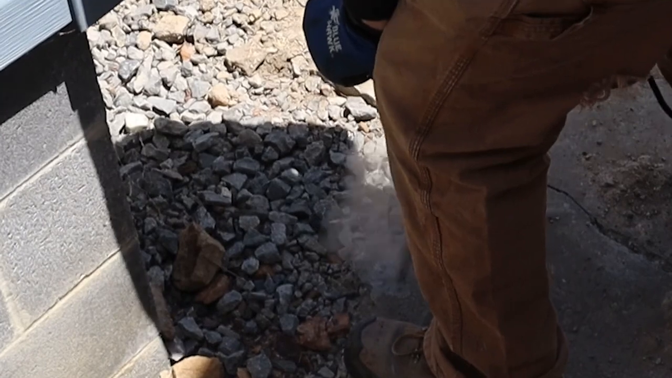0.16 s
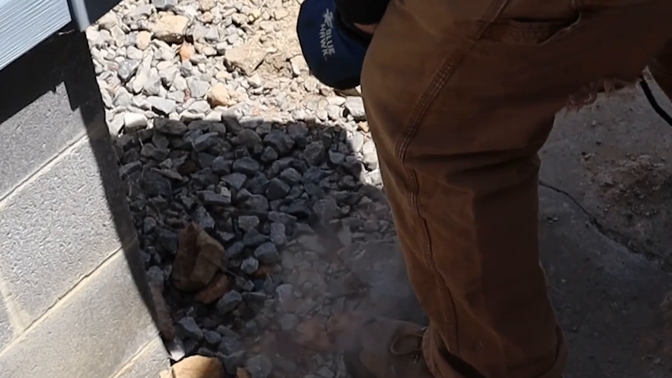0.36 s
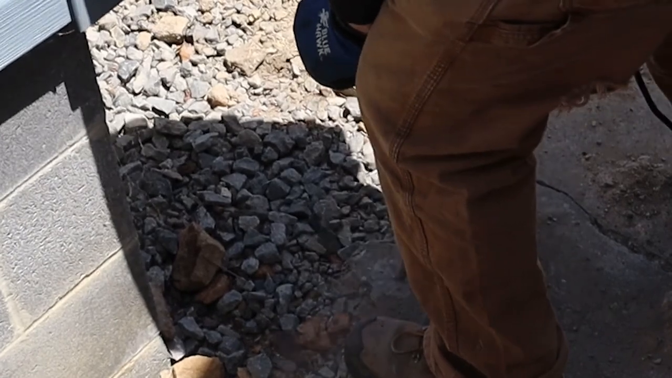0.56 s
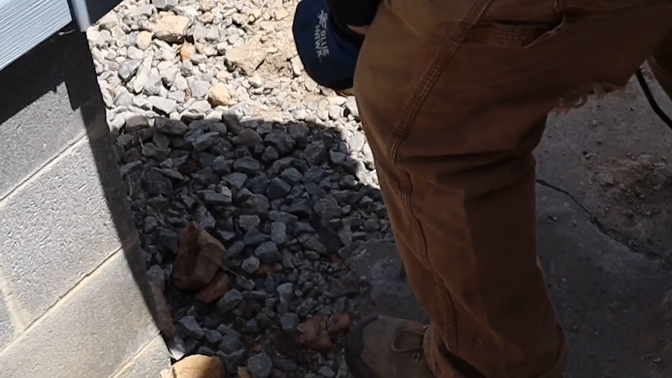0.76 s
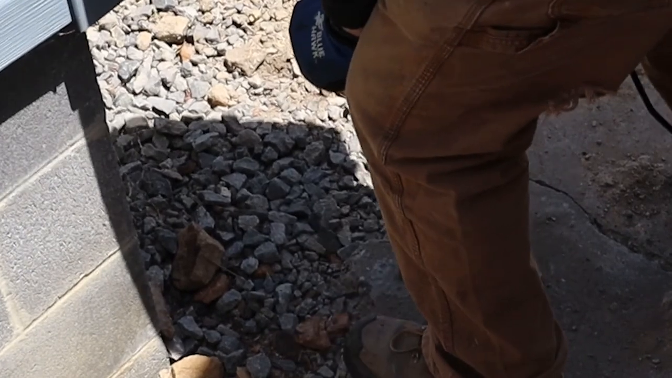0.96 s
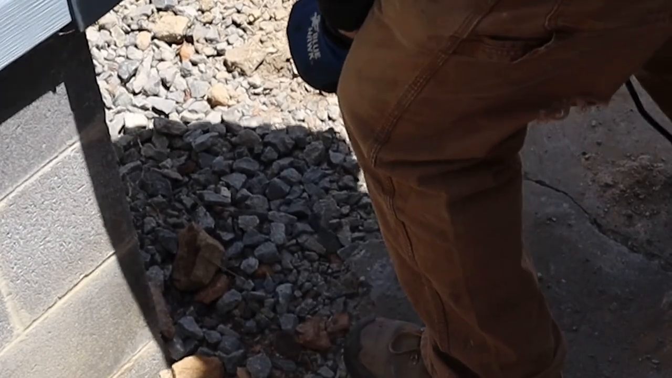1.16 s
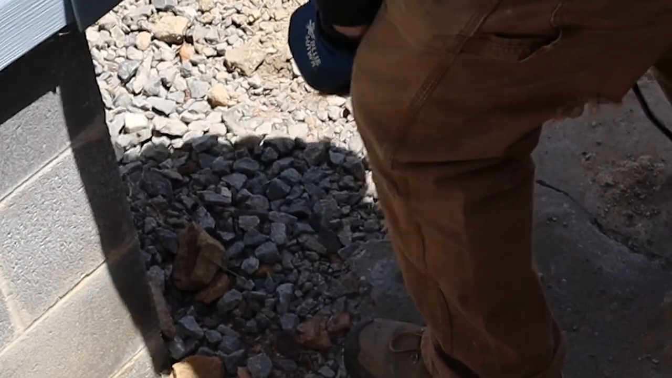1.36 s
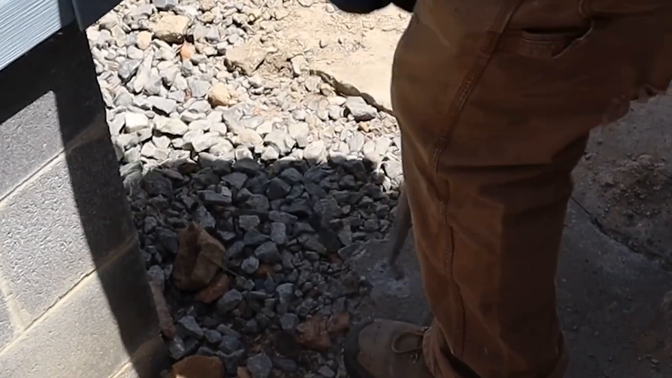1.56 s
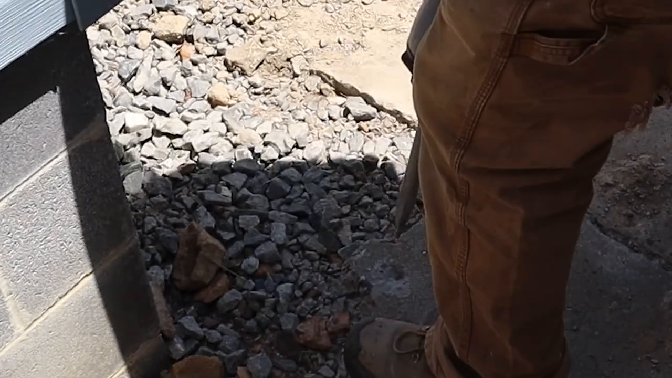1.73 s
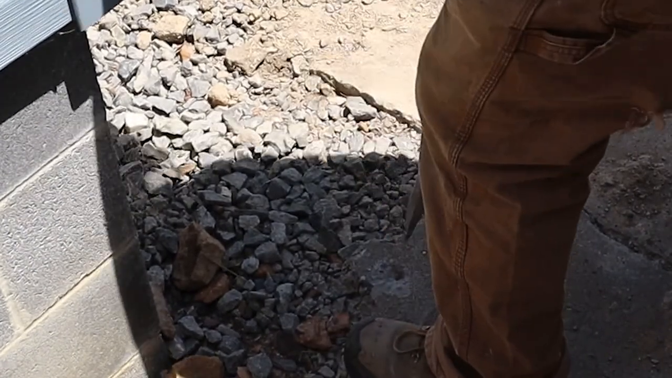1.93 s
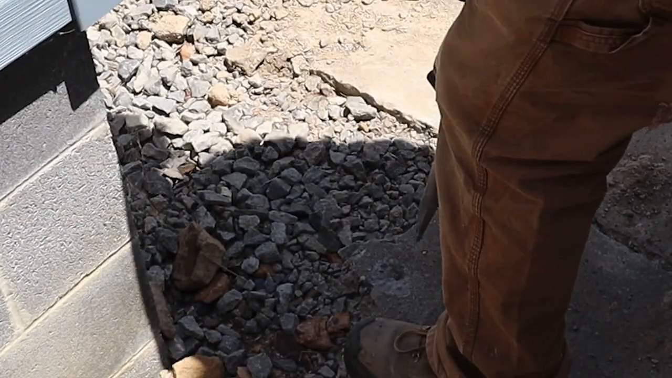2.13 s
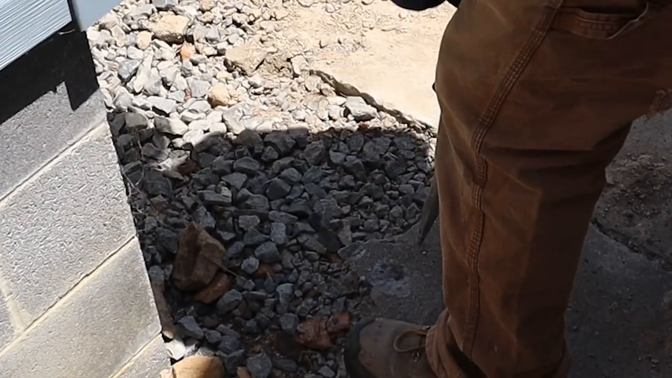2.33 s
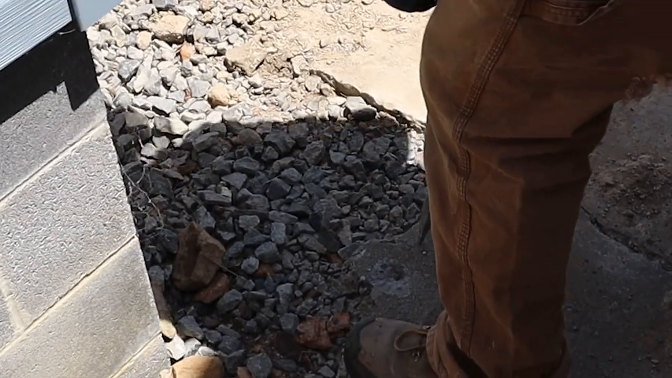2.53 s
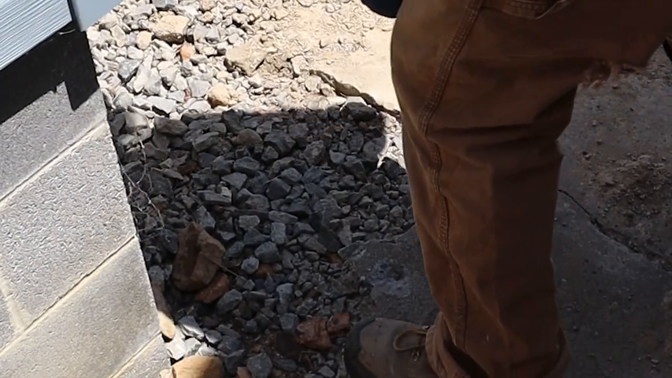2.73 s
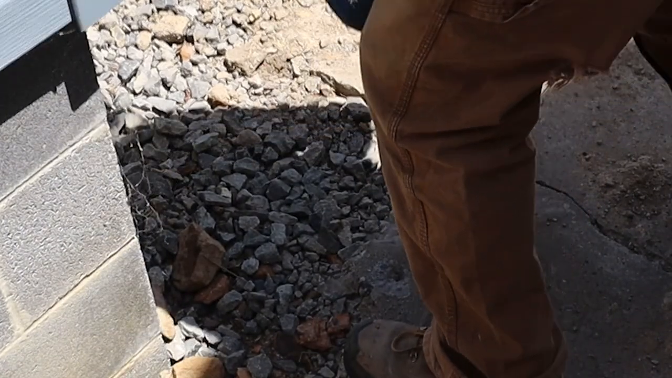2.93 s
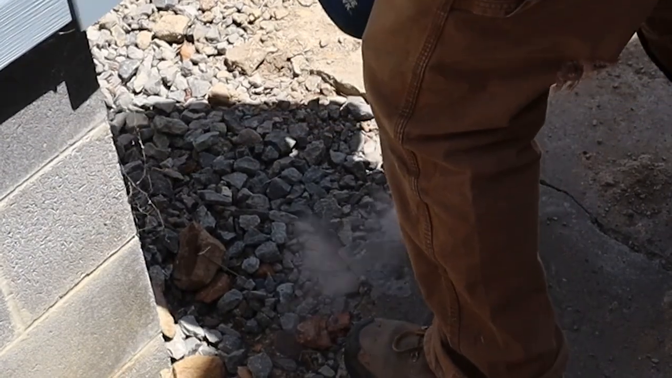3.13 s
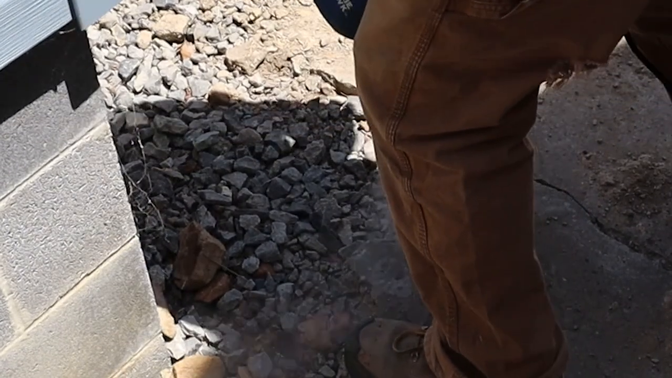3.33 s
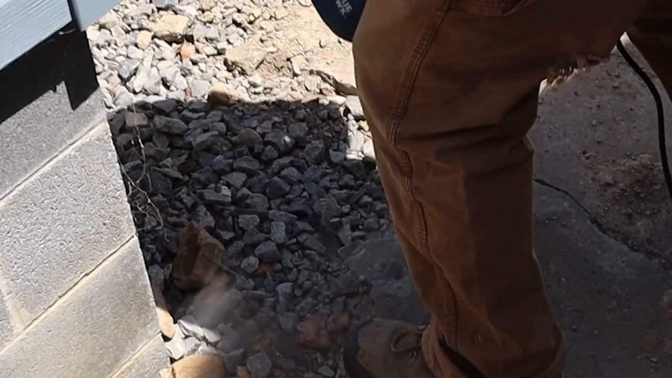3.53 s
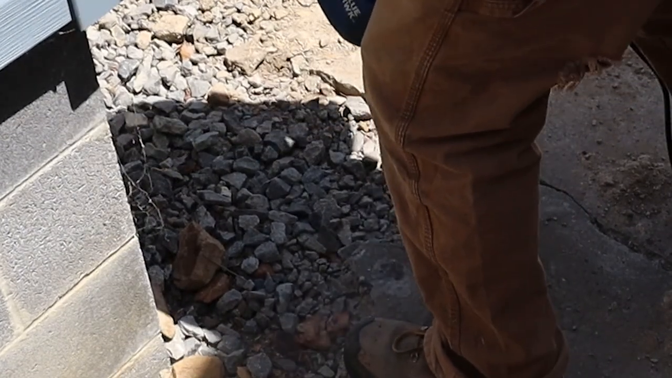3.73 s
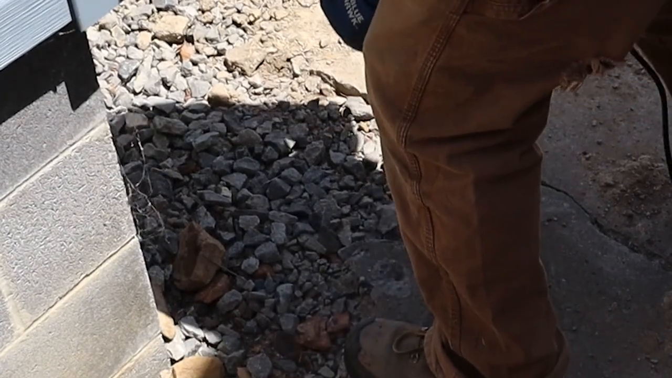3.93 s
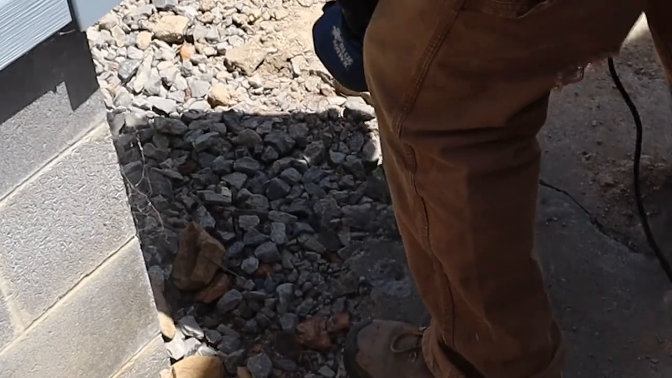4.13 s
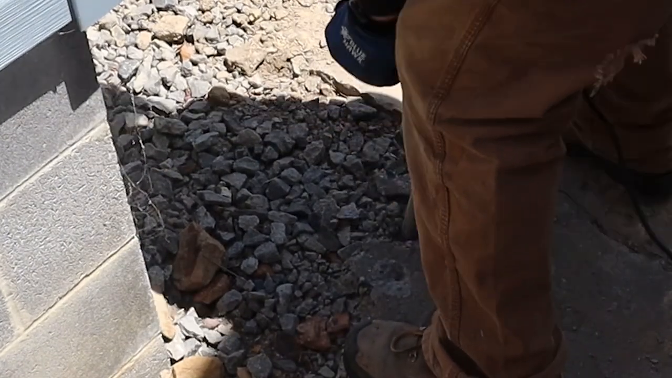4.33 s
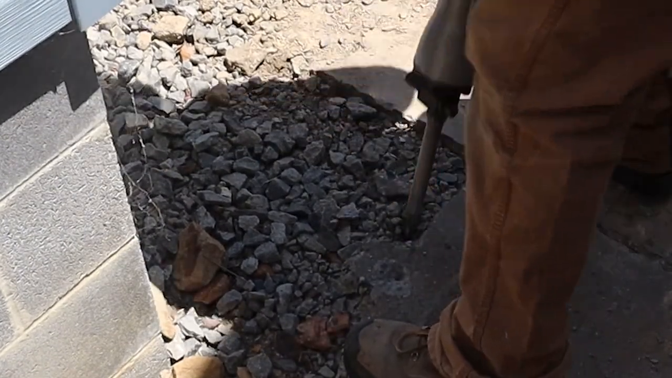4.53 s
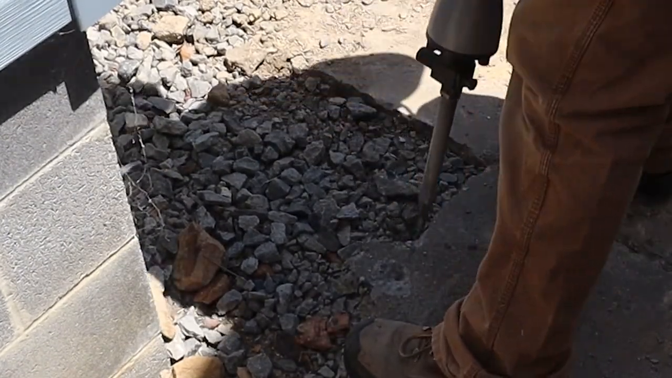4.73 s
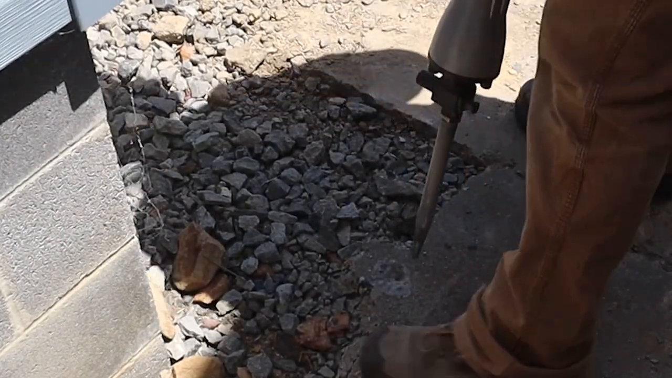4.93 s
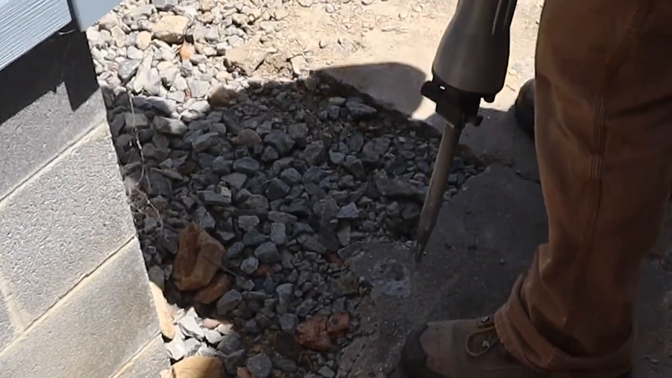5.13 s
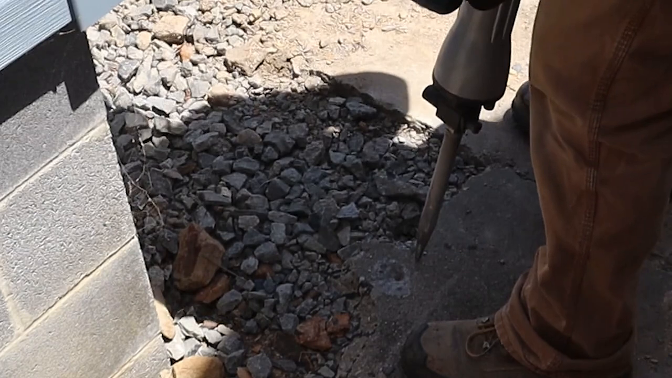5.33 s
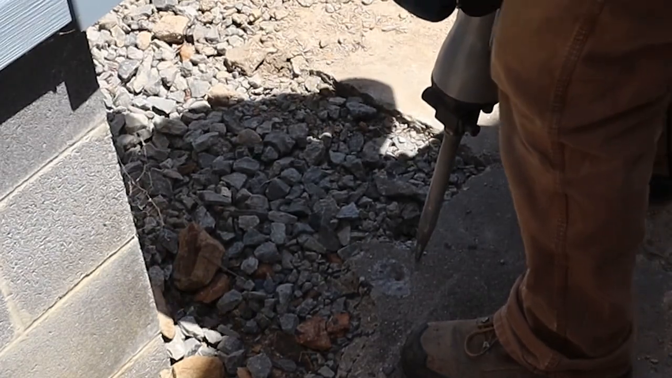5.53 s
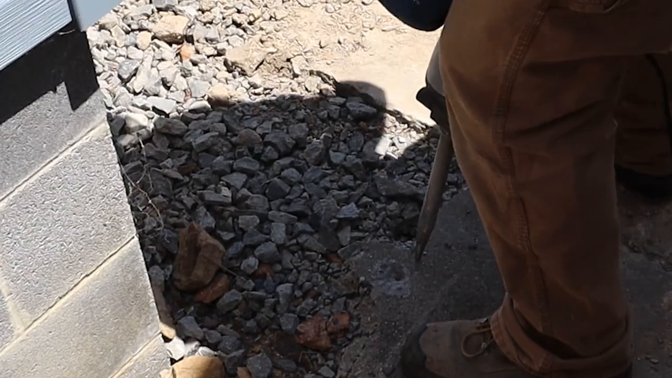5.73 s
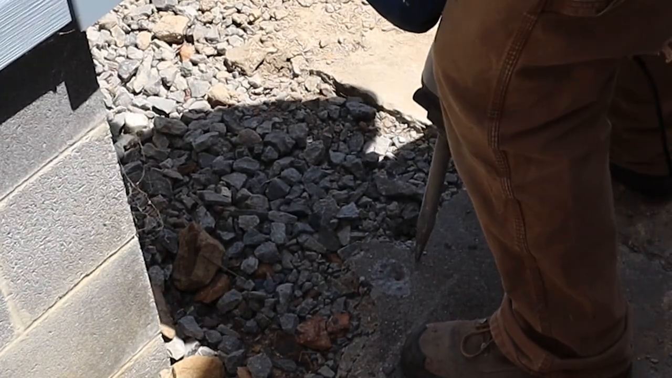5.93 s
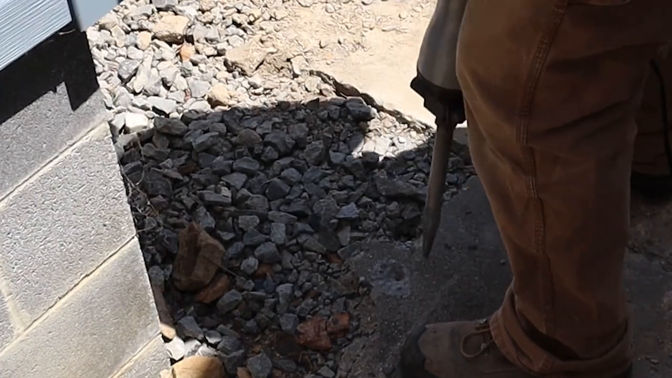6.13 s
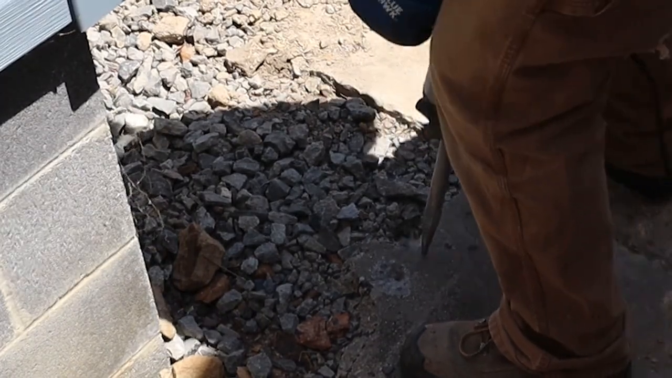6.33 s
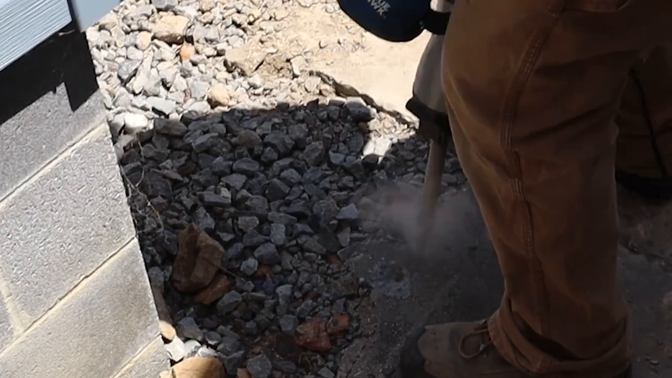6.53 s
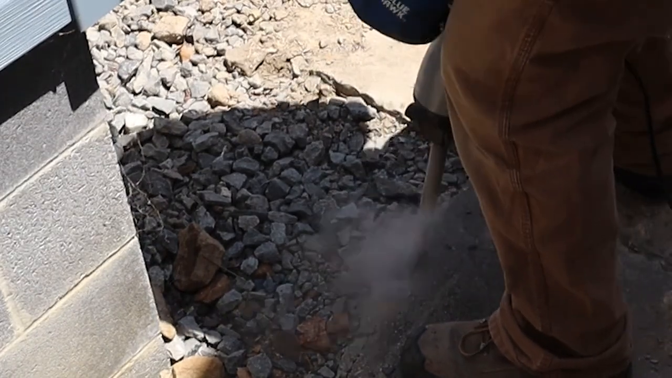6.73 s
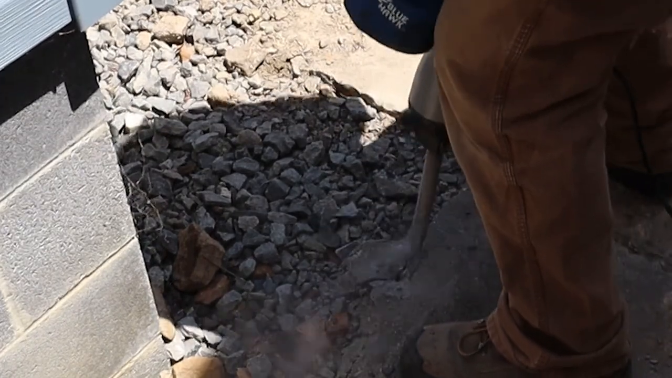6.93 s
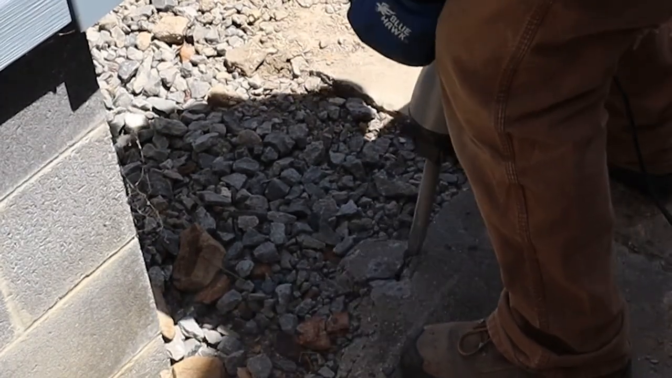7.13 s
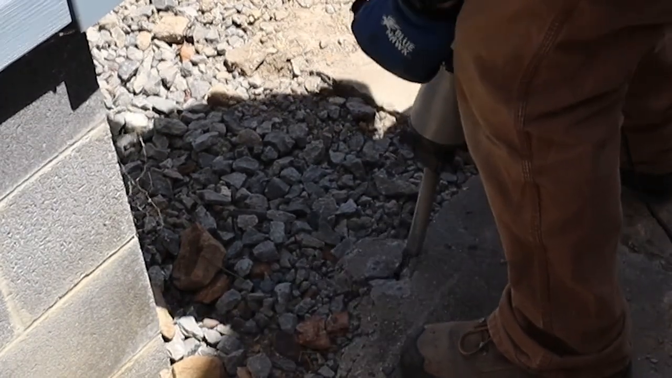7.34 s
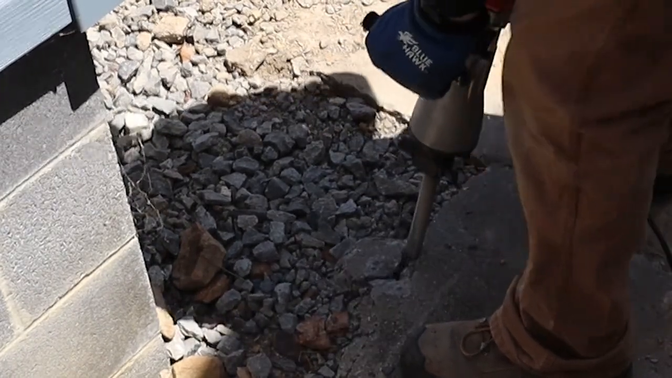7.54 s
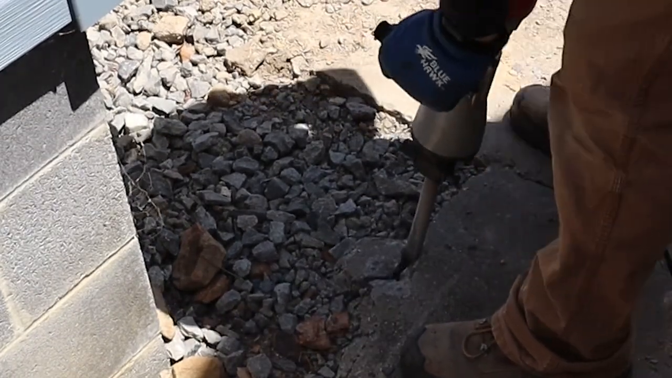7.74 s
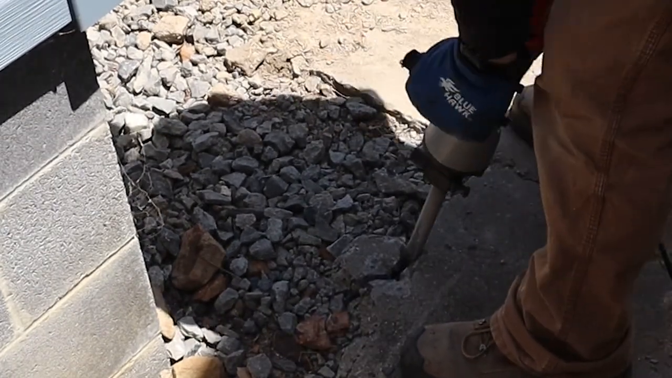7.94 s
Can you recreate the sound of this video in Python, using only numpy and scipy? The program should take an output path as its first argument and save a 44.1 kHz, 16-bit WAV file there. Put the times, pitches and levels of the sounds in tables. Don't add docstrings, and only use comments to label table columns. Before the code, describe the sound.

Close stereo outdoors, with a short diffuse tail from wall and rubble. From the start an electric demolition hammer is at full work, about twenty-four even blows a second: hard concrete crack, brief steel ring, low slab thud, over gritty motor roar and hiss. At 1.5 s it stops and coasts down, piston chuffs slowing until about 2.2 s, with small clicks and dull knocks near 2.4 s. At 2.8 s the motor surges, and from 2.95 s a louder burst hammers, weakening near 3.9 s into brighter, lighter strokes until 4.4 s. Chuffs widen and dull until 5.4 s, with stone ticks and thumps. At 5.65 s the motor kicks in and the loose chisel rattles rapidly until 6.4 s. The third burst cracks and rings, thin high singing around 6.7 s, thud thinning; a whine climbs to 7.4 s, then clanking blows space out until 7.9 s.

```python
import sys
import numpy as np
from scipy import signal
from scipy.fft import rfft, irfft, next_fast_len
from scipy.io import wavfile
from scipy.ndimage import map_coordinates

SR = 44100
rng = np.random.default_rng(int(sys.argv[2]) if len(sys.argv) > 2 else 0)


def attenuation_scalar(level_db):
    decades = np.asarray(level_db, float) / 20
    return 10 ** decades


def waveform_to_disk(signal):
    frames = np.transpose(np.atleast_2d(signal))
    scaled = np.clip(frames, -1, 1) * 32767
    samples = np.round(scaled).astype(np.int16)
    wavfile.write(sys.argv[1], SR, samples)


N = 356328

# time in seconds, effort in dB, weight on the slab in dB.
MOTOR_RUNS = [
    [(0, -40, -39.5), (1.5, -41.5, -40.5), (1.6, -43.5, -43.5), (1.66, -50, -58), (1.702, -52.5, -76.5),
     (2.378, -55, -61), (2.56, -74, -65.5), (2.74, -88.5, -96)],
    [(2.765, -54, -54), (2.8, -39, -45), (2.87, -37, -74), (2.96, -36.5, -50), (3.11, -37.5, -43),
     (3.44, -37.5, -44.5), (3.88, -40, -47), (4.08, -39, -62), (4.35, -40, -56.5), (4.65, -47, -61),
     (5.19, -53, -56), (5.4, -66, -61), (5.52, -90.5, -74.5)],
    [(5.6, -82, -67), (5.68, -35, -38), (5.78, -67, -57), (5.95, -44, -48), (6.31, -36, -46),
     (6.6, -34, -37), (6.95, -38, -47), (7.44, -37.5, -41.5), (7.8, -45, -46), (8.08, -60, -64)],
]
STEADY_DB = -37.5
# time in seconds, knocks per second, level in dB.
LOOSE_CHISEL = [
    (5.62, 43, -120),
    (5.64, 65, -43),
    (5.73, 46, -34),
    (5.9, 54, -28),
    (6.25, 59, -27.5),
    (6.36, 34, -26),
    (6.6, 83, -40.5),
    (6.7, 35, -120),
]
# frequency in Hz, density in dB per Hz.
HARD_EDGE = [(3530, -16), (6000, 1.5), (7970, -2), (10000, -6.5), (14200, -13.5), (16000, -5.5),
             (16500, -45)]


def unit(x):
    return x / np.sqrt(np.mean(x ** 2) + 1e-20)


def along(points, hz):
    f, v = np.transpose(points)
    return np.interp(np.log(hz + 1), np.log(f + 1), v)


def curves(rows):
    s, *cols = np.transpose(rows)
    return [np.interp(np.arange(N) / SR, s, c) for c in cols]


def wobble(rate):
    return map_coordinates(rng.standard_normal(int(N * rate / SR) + 4), [np.arange(N) * rate / SR])


def low_cut(hz, corner):
    return 1j * hz / (1j * hz + corner)


def filtered(x, response):
    m = next_fast_len(N + SR // 2)
    return irfft(rfft(x, m) * response(np.fft.rfftfreq(m, 1 / SR)), m)[..., :N]


def resonant(x, peaks):
    def response(f):
        total = 0
        for k, (center, width, db) in enumerate(peaks):
            total = total + (-1) ** k * attenuation_scalar(db) * 1j * f * width / (center * center - f * f + 1j * f * width)
        return total
    return unit(filtered(x, response))


def rush(spectrum):
    # frequency in Hz, correlation from 0 to 1.
    likeness = [(40, 0.5), (100, 0.41), (300, 0.86), (700, 0.73), (1500, 0.46), (4000, 0.25),
                (12000, 0.049)]

    def mid_and_side(hz):
        turn = np.arccos(np.clip(along(likeness, hz), -1, 1)) / 2
        return attenuation_scalar(along(spectrum, hz)) * [np.cos(turn), np.sin(turn)]
    mid, side = filtered(rng.standard_normal((2, N)), mid_and_side)
    return unit(np.array([mid + side, mid - side]))


def struck(times, gains, shape):
    train = np.bincount(np.round(np.asarray(times) * SR).astype(int), gains, N)[:N]
    return signal.fftconvolve(train[None], np.atleast_2d(shape), axes=1)[:, :N]


def place(out, s, sound):
    start = round(s * SR)
    out[..., start:start + sound.shape[-1]] += sound


def ring(modes, length, attack, scatter_db, spread, rough):
    t = np.arange(round(length * SR)) / SR
    hz, db, t60, pan = np.transpose(modes)[..., None]
    wander = np.cumsum(rng.standard_normal((len(modes), len(t))), axis=1) * rough * hz / SR
    decay_db = db + scatter_db * rng.standard_normal(hz.shape) - 60 * t / t60
    level = attenuation_scalar(decay_db) * (1 - np.exp(-t / attack))
    apart = spread * np.cos(np.arange(len(modes)) * np.e)[:, None]
    phase = 2 * np.pi * hz * t + wander
    return np.array([np.sum(level * attenuation_scalar(side * pan / 2) * np.sin(phase + side * apart), axis=0)
                     for side in (1, -1)])


def hammer():
    # time in seconds, crack peak in dB, slab thud in dB.
    effort_1 = [
        (0.0159, -16.5, -20),
        (0.2768, -13.5, -19.5),
        (0.7099, -14, -19.5),
        (1.0994, -14, -19.5),
        (1.443, -13.5, -20.5),
        (1.4883, -14.5, -19.5),
        (1.5405, -15, -23),
    ]
    effort_2 = [
        (2.965, -5.5, -23),
        (3.0126, -8, -19),
        (3.0993, -9.5, -18),
        (3.4117, -9.5, -19.5),
        (3.5392, -11.5, -19.5),
        (3.842, -14, -23),
        (3.9277, -18.5, -24.5),
        (4.0088, -15.5, -24.5),
        (4.05, -15, -31),
    ]
    effort_3 = [
        (6.3957, -15, -20),
        (6.53, -12, -22.5),
        (6.604, -17, -21.5),
        (6.6798, -15.5, -22.5),
        (6.7561, -15, -24),
        (6.8401, -22, -28),
        (6.921, -21.5, -37),
        (7.002, -20, -32.5),
        (7.3569, -18, -36),
    ]
    row_blows = [
        [0, 6, 16, 25, 33, 34, 35],
        [0, 1, 3, 10, 13, 20, 22, 24, 25],
        [0, 4, 6, 8, 10, 12, 14, 16, 25],
    ]
    # time in seconds, crack change in dB, thud change in
    # dB.
    uneven_blows = [(.234, -3.5, -2), (.884, -1, -1), (3.928, -1.5, -10), (6.429, 5, 2.5), (6.496, -14, -1.5),
                    (6.718, -1, 2.5), (7.081, -4, -2), (7.239, -1, 1), (6.462, 0.5, -3.5), (6.568, -4, 0),
                    (6.878, 0.5, 0), (7.119, -1.5, 0), (7.16, -1, 3), (7.198, 0.5, 4.5), (7.318, 0.5, -1),
                    (3.058, 1, 0), (.32, 0.5, 1)]
    # time in seconds, crack peak in dB, slab thud in dB.
    off_slab = [(2.368, -32, -41), (4.0933, -21, -46), (4.135, -32, -55), (4.1752, -25.5, -63),
                (4.215, -25.5, -59), (4.256, -24, -46), (4.2963, -23.5, -40), (4.34, -21.5, -49),
                (4.3855, -18.5, -45), (4.4395, -20, -44), (7.399, -17, -29), (7.4449, -14.5, -28),
                (7.4983, -12, -32), (7.5574, -11, -30), (7.63, -11.5, -30), (7.7243, -11, -33),
                (7.864, -14.5, -29.5)]
    jitter_s, crack_scatter_db, thud_scatter_db = .0004, 0.14, -0.74
    bursts = []
    for numbers, effort in zip(row_blows, (effort_1, effort_2, effort_3)):
        every_blow = np.arange(numbers[-1] + 1)
        rows = np.transpose([np.interp(every_blow, numbers, c) for c in np.transpose(effort)])
        rows = rows + rng.standard_normal(rows.shape) * [jitter_s, crack_scatter_db, thud_scatter_db]
        for s, crack_db, thud_db in uneven_blows:
            rows = rows + (np.abs(rows[:, :1] - s) < .015) * [0, crack_db, thud_db]
        bursts.append(rows)
    return [np.transpose([s, crack, thud - crack]) for s, crack, thud in map(np.transpose, bursts + [off_slab])]


def chisel(burst, steel, crack, edge, ring_db, edge_db, repeat_db):
    # time in seconds, rise in Hz.
    working_free = [
        (6.85, 0),
        (7.1, 330),
        (7.38, 950),
    ]
    ringing = np.zeros((2, N + SR))
    for s, db, _ in burst:
        modes = np.array(steel)
        rise_hz = np.interp(s, *np.transpose(working_free), right=0)
        shank = np.abs(modes[:, 0] - 4200) < 1400
        modes[shank] = modes[shank] + [rise_hz, 0, 0, 0]
        modes[1, 1] -= 10 * rise_hz / 1000
        blow = ring(modes, length=1 / 14, attack=0.00023, scatter_db=2.5, spread=0.49, rough=0.94)
        place(ringing, s, attenuation_scalar(db + ring_db) * blow)
    t = np.arange(SR // 10) / SR
    sharp = attenuation_scalar(-60 * t / 0.022) + 0.61 * attenuation_scalar(-60 * t / 0.0027)
    bounce = 0.29 * (t > .006) * attenuation_scalar(-60 * t / 0.037)
    crumble = 0.23 * attenuation_scalar(-60 * t / 0.094)
    shape = (sharp + bounce + crumble) * (1 - np.exp(-t / 0.00044))
    s, db, _ = np.transpose(burst)
    same_grain = crack[:, round(s[0] * SR):][:, :len(t)]
    same = struck(s, attenuation_scalar(db + repeat_db), shape * same_grain)
    fresh = struck(s, attenuation_scalar(db - 11.5), shape) * (attenuation_scalar(-1) * crack + attenuation_scalar(edge_db) * edge)
    return ringing[:, :N] + same + fresh


def steel_and_splinters(first, second, third, lifted):
    # frequency in Hz, level in dB, t60 in seconds, left-right balance in dB.
    held_1 = [(2650, -9, 0.03, 11), (3850, -21.5, 0.07, -10), (5770, -16, 0.041, -24),
              (5730, -18.5, 0.034, 2.5), (8420, -12, 0.03, 0), (9020, -9.5, 0.015, -0.5),
              (11580, -7.5, 0.025, -6.5), (14300, -13.5, .03, -1.5)]
    held_2 = [(1944, -13, 0.029, -22), (3050, 0, 0.011, -8), (4920, -26, 0.06, -19.5),
              (5430, -27, 0.15, -26.5), (8000, -15.5, 0.054, -3), (10750, -10.5, 0.014, 4),
              (12100, -16.5, 0.065, -7), (15100, -23.5, .05, -15.5)]
    held_3 = [(2050, -6, 0.019, -13), (3045, 9, 0.017, -4), (5225, -2, 0.037, -5), (7800, -9, 0.062, -3),
              (9600, -22, 0.045, -4), (11800, -12, 0.05, -4), (12800, -13.5, 0.045, -10)]
    held_lifted = [(2570, 4, 0.031, -7), (4190, 10, 0.022, -6), (5140, 5.5, 0.041, -1.5),
                   (5760, 4.5, 0.017, -17), (8430, -3.5, 0.044, -5), (12400, -5, 0.081, -7)]
    # frequency in Hz, density in dB per Hz.
    splinters = [(530, -8.5), (900, -7.5), (1500, -12.5), (2250, -13.5), (3060, -11), (3480, -12.5),
                 (8000, -33), (10400, -36.5), (17600, -120)]
    grit = rush(splinters), rush(HARD_EDGE)
    steel = chisel(first, held_1, *grit, ring_db=-10.5, edge_db=-9.0, repeat_db=-12)
    steel = steel + chisel(second, held_2, *grit, ring_db=-8.5, edge_db=-7.5, repeat_db=-9.0)
    steel = steel + chisel(third, held_3, *grit, ring_db=-5.5, edge_db=2.0, repeat_db=-9)
    return steel + chisel(lifted, held_lifted, *grit, ring_db=-19.5, edge_db=-3.5, repeat_db=-13.5)


def seated(blows, modes, rebound, db):
    first = ring(modes, length=1 / 10, attack=.00024, scatter_db=0, spread=.4, rough=0)
    delay, *gains = rebound
    again = np.pad(first, ((0, 0), (round(delay * SR), 0)))[:, :first.shape[1]] * np.c_[gains]
    return struck(blows[:, 0], attenuation_scalar(blows[:, 1] + db), -first - again)


def sockets(first, second):
    # frequency in Hz, level in dB, t60 in seconds, left-right balance in dB.
    socket_1 = [(1958, -4, .006, 12), (2016, -6, .078, -4.5), (2063, -2, .08, -7), (2395, 7.5, .006, -.5),
                (2549, -6, .063, -2), (3061, -6, .079, -9), (3566, -5.5, .043, -11.5)]
    socket_2 = [(1976, -5, .06, 0), (2447, -12, .013, -6.5), (2588, -12, .067, -5),
                (2887, -13.5, .025, -5.5), (3054, 9, .012, -4), (3242, -12, .06, -.5),
                (4054, -8, .08, -5.5)]
    # delay in seconds, left gain, right gain.
    shank_echoes = [
        (.00197, -.41, -.64),
        (.00147, -.68, -.8),
    ]
    return seated(first, socket_1, shank_echoes[0], db=-11.5) + seated(second, socket_2, shank_echoes[1], db=-14.0)


def striker(blows):
    t = np.arange(SR // 100) / SR
    strength = attenuation_scalar(blows[:, 1] - 30 + 2.1 * rng.standard_normal(len(blows)))
    brush_past = struck(blows[:, 0] - .0065, strength, np.sin(np.pi * t * 100) ** 2)
    return brush_past * rush([(2500, -48.0), (3500, 9), (4000, -9.5), (4500, -10.5), (6000, -38.5)])


def singing():
    # time in seconds, level in dB.
    let_go = [
        (6.604, -50),
        (6.6794, -34),
        (6.718, -38),
        (6.7566, -40),
        (6.798, -42),
        (6.8403, -51),
        (7.04, -54),
        (7.12, -46),
        (7.2, -48),
    ]
    # frequency in Hz, level in dB, t60 in seconds, left-right balance in dB.
    free_modes = [(7950, -1, 0.4, -4), (8850, 3, .15, 0), (12000, -4, .15, 0), (12600, -9, .15, 0)]
    s, db = np.transpose(let_go)
    return struck(s, attenuation_scalar(db), ring(free_modes, length=1 / 5, attack=.002, scatter_db=-1, spread=.5, rough=.1))


def slab(blows):
    # frequency in Hz, level in dB, t60 in seconds, left-right balance in dB.
    outward = [(114, -11, .076, -4), (165, -17, .07, -2), (332, -8.5, .073, 4.5), (448, -8.5, .11, 3),
               (595, -13, .11, 7.5), (780, -11.5, .1, 4), (944, -5, .035, 6.5), (1557, -12, .087, -4)]
    backward = [(254, -3.5, .085, 1.5), (507, -8, .145, 0), (652, -3.5, .029, 2.5), (1033, -4, .067, 6),
                (1177, -8, .048, 2), (1378, -16, .098, 5.5), (1712, -13, .064, 4.5)]
    out, back = (ring(modes, length=1 / 6, attack=.0007, scatter_db=0, spread=.35, rough=0)
                 for modes in (outward, backward))
    return struck(blows[:, 0] + 0.00031, attenuation_scalar(blows[:, 1] + blows[:, 2]), back - out)


def broken(blows, modes):
    out = np.zeros((2, N + SR))
    for s, db, over_db in blows:
        thud = ring(modes, length=1 / 6, attack=.001, scatter_db=2, spread=.3, rough=.1)
        place(out, s + .001, attenuation_scalar(db + over_db + 4) * thud)
    return filtered(out[:, :N], lambda hz: low_cut(hz, 140) ** 3)


def shock(blows, db):
    push = ring([(900, db, .005, 2)], length=1 / 50, attack=.0002, scatter_db=0, spread=.2, rough=0)
    return struck(blows[:, 0] + .0024, attenuation_scalar(blows[:, 1] + blows[:, 2]), push)


def concrete(first, second, third, lifted):
    # frequency in Hz, level in dB, t60 in seconds, left-right balance in dB.
    cracked_edge = [(276, -2.5, 0.057, -3), (332, -2.5, 0.051, -1), (463, -2, 0.058, 0),
                    (503, -4, 0.062, 0), (626, -4, .045, 5.5), (790, -7.5, 0.028, 10),
                    (1026, -4.5, 0.036, 11.5)]
    loose_piece = [(273, -2.5, 0.12, 1), (425, -0.5, 0.038, -3), (770, -22, 0.035, 2), (996, -6, 0.033, 5),
                   (1644, -4, 0.034, 0)]
    shock_levels = [-3, 5, 4, 3]
    thud = slab(np.concatenate([first, second])) + broken(third, cracked_edge) + broken(lifted, loose_piece)
    return thud + sum(shock(burst, db) for burst, db in zip((first, second, third, lifted), shock_levels))


def motor():
    # frequency in Hz, density in dB per Hz.
    casing_roar = [(350, -13), (600, -3), (933, -11), (1170, 0), (1270, -9), (1590, 2), (2680, 0.5),
                   (3320, 2), (4120, 1.5), (5110, -1), (5660, 0.5), (7010, -18), (9000, -15),
                   (11700, -37.5), (19800, -120)]
    ground_rumble = [(100, -60.5), (190, -25), (260, -3.5), (370, -0.5), (496, -6.5), (858, -8),
                     (1010, -15), (1200, -9), (1560, -21.5), (2640, -120)]
    brush_hiss = [(3530, -22), (6000, -8), (6870, -6), (8100, -4), (9890, -15.5), (12800, -6),
                  (15700, -15.5), (16200, -42), (16500, -39.5)]
    # frequency in Hz, width in Hz, level in dB.
    gearbox = [(5920, 290, 1), (8560, 150, -3.5), (8690, 210, -0.5)]
    t = np.arange(N) / SR
    effort_db, weight_db = curves(np.concatenate(MOTOR_RUNS))
    grind_db = 2.0 * wobble(30) + 2.15 * wobble(300)

    shaken = attenuation_scalar(curves(LOOSE_CHISEL)[1] - 1)
    roar = np.hypot(attenuation_scalar(effort_db), shaken) * attenuation_scalar(grind_db) * rush(casing_roar)
    rumble = attenuation_scalar(weight_db - 0.5 + 1.4 * wobble(25)) * rush(ground_rumble)

    spin_up_s = 0.14
    at_speed_db = np.minimum(effort_db, np.interp(t - spin_up_s, t, effort_db))
    hiss_db = -42.5 + 2.38 * (at_speed_db - STEADY_DB)
    hiss = attenuation_scalar(hiss_db + 0.65 * grind_db) * rush(brush_hiss)

    turned_s = 1.63
    gears_db = effort_db - 10 + grind_db - 300 * np.maximum(t - turned_s, 0)
    gears = attenuation_scalar(gears_db) * resonant(rush([(500, 0.014), (9000, 0.0081)]), gearbox)

    whine_from_s, whine_to_s = 7.05, 7.4
    left = whine_to_s - t
    whine_db = -42 - 11 * left - 400 * np.maximum(-left, 0) - 150 * np.maximum(whine_from_s - t, 0)
    whine_hz = np.maximum(6280 - 1900 * left, 0) + 130 * wobble(280)
    phase = 2 * np.pi * np.cumsum(whine_hz) / SR
    whine = attenuation_scalar(whine_db + 2.5 * wobble(60)) * (np.sin(phase) + attenuation_scalar(-11) * np.sin(2 * phase))
    return roar + gears + rumble + hiss + whine


def coasting():
    # time in seconds, peak in dB.
    run_downs = [
        [(1.6806, -30.5), (1.7523, -31.5), (1.841, -31.5), (1.9343, -28), (2.0493, -31), (2.2023, -33)],
        [(4.519, -24.5), (4.5845, -24.5), (4.6717, -24.5), (4.7658, -23.5), (4.8823, -25.5), (5.029, -21.5),
         (5.318, -24)],
    ]
    rows = []
    for s, db in map(np.transpose, run_downs):
        gap = np.diff(s, append=N / SR)
        bright_db = -16.5 - 24 * (s - s[0])
        t60 = np.minimum(1.7 * gap, .26)
        rows += zip(s, db, bright_db, t60)
    return rows


def strokes():
    # time in seconds, peak in dB, brightness in dB, t60 in seconds.
    turns_and_knocks = [(2.329, -34, -24, 0.044), (2.368, -31, -35, 0.15), (2.4525, -27.5, -34, 0.029),
                        (2.471, -31, -25, 0.19), (2.7452, -48, -4.5, 0.33), (2.854, -18, -22, 0.3),
                        (2.919, -14, -20, 0.27), (4.6335, -39, -29, 0.073), (4.7148, -29, -34, 0.11),
                        (4.8317, -29.5, -35, 0.072), (4.8999, -30.5, -34, 0.23), (4.999, -28, -39, 0.024),
                        (5.099, -23, -19, 0.057), (5.165, -35.5, -23, 0.16), (5.2541, -33, -33, 0.15),
                        (5.117, -25.5, -18, 0.093), (5.613, -41, -7, 0.15), (5.652, -18, -20, 0.16),
                        (5.7234, -13.5, -16, 0.93), (6.322, -19, -17, 0.053), (7.7454, -20, -29, 0.16),
                        (7.872, -26.5, -22, 0.21), (7.948, -33, -29, 0.41)]
    # frequency in Hz, width in Hz, level in dB.
    piston_tube = [(1220, 230, 4), (2025, 190, 8), (2560, 450, 7.5), (3900, 630, 4.5), (4580, 520, 5.5),
                   (6460, 1330, -5)]
    t = np.arange(SR // 2) / SR
    jolt = 1 + 0.82 * attenuation_scalar(-60 * t / 0.0052)
    grind, bright = np.zeros((2, N + SR))
    for s, db, bright_db, t60 in turns_and_knocks + coasting():
        fade = attenuation_scalar(db - 60 * (t / max(t60, .005)) ** 1.66) * jolt
        place(grind, s, fade)
        place(bright, s, fade * attenuation_scalar(bright_db - 60 * t / 0.37))
    grit = attenuation_scalar(3.2 * wobble(250))
    tube = resonant(rush([(500, 0.0045), (9000, 0.0075)]), piston_tube)
    return grit * (attenuation_scalar(-17.5) * grind[:N] * tube + attenuation_scalar(-9.0) * bright[:N] * rush(HARD_EDGE))


def ticks(rows, t60, ring_db, click_db):
    out, t = np.zeros((2, N + SR)), np.arange(SR // 20) / SR
    for s, db, hz in rows:
        tick = ring([(hz, db + ring_db, t60, 0)], length=1 / 20, attack=.0006, scatter_db=1.5, spread=.3, rough=.8)
        click = attenuation_scalar(db + click_db - 60 * t / .006) * rng.standard_normal(len(t))
        place(out, s, tick + click)
    return filtered(out[:, :N], lambda hz: low_cut(hz, 900) ** 2 / (1 + 1j * hz / 7000) ** 2)


def chatter():
    # time in seconds, peak in dB, ring in Hz.
    knock_rows = [(5.6806, -17.5, 2170), (5.719, -19, 2610), (5.7459, -14, 2190), (5.7896, -16, 2800),
                  (5.828, -16, 2140), (5.8923, -27, 2100), (5.9178, -18.5, 2160), (5.9507, -17, 2260),
                  (5.9696, -22, 2630), (5.9894, -21, 2210), (6.0056, -25, 2250), (6.027, -22, 2140),
                  (6.0466, -21, 2380), (6.0674, -16, 2130), (6.088, -21, 2570), (6.1034, -20.5, 2190),
                  (6.124, -25, 2400), (6.1354, -17, 2230), (6.1577, -16, 2310), (6.1745, -15, 2300),
                  (6.2086, -19, 2140), (6.2261, -16, 2350), (6.25, -14, 2270), (6.261, -23, 2340),
                  (6.2794, -22, 2850), (6.3216, -15, 2290), (6.3483, -27, 2220), (6.3812, -19, 2370),
                  (6.3963, -11, 2840)]
    # frequency in Hz, width in Hz, level in dB.
    holder_peaks = [(1564, 110, -18), (2140, 380, 1), (2730, 620, -4), (3810, 260, -1.5), (5200, 500, -14),
                    (6880, 1500, -14)]
    slid_home = [1, 1.06, 1, 1.18, 1, 1]
    rate, db = curves(LOOSE_CHISEL)
    turn = np.cumsum(rate * (1 + 0.14 * wobble(40))) / SR % 1
    t = np.arange(SR // 20) / SR
    s, peak_db, _ = np.transpose(knock_rows)
    stirred = 0.82 * struck(s, attenuation_scalar(peak_db - peak_db.mean()), attenuation_scalar(-60 * t / 0.038))[0]
    each_turn = attenuation_scalar(2 * wobble(66)) * np.exp(-turn / 0.3) * (1 - np.exp(-turn / 0.06))
    clump = 0.41 + stirred + 0.22 * each_turn
    grit = clump * attenuation_scalar(3.9 * wobble(500)) * rush([(500, 0.0066), (9000, 0.01)])
    low = resonant(grit, holder_peaks)
    high = resonant(grit, [(hz * rise, w, peak) for (hz, w, peak), rise in zip(holder_peaks, slid_home)])
    share = np.clip((np.arange(N) / SR - s[0]) / (s[-1] - s[0]), 0, 1) * np.pi / 2
    rattle = attenuation_scalar(db - 4.5) * (np.cos(share) * low + np.sin(share) * high)
    knocks = ticks(knock_rows, t60=.03, ring_db=-4.5, click_db=-5)
    return (rattle + knocks) * attenuation_scalar([[-1.2], [1.2]])


def stones():
    # time in seconds, peak in dB, ring in Hz.
    nudges = [(4.8094, -32, 3680), (4.8319, -39, 2400), (4.901, -26, 2650), (4.9244, -25, 2650),
              (5.03, -33, 2620), (5.1003, -29, 4030), (5.1188, -33, 2340), (5.1662, -37, 2340),
              (5.3228, -24, 2400), (5.345, -33, 2630), (5.3844, -42, 2010)]
    return ticks(nudges, t60=0.014, ring_db=-1, click_db=-11)


def thumps():
    # time in seconds, peak in dB, frequency in Hz, t60 in seconds.
    dull_knocks = [(2.335, -39, 297, 0.068), (2.372, -35, 210, 0.043), (2.473, -53, 2280, 0.4),
                   (2.686, -69, 300, .05), (2.707, -70, 350, 0.033), (2.786, -54, 258, 0.046),
                   (2.929, -21, 113, 0.18), (2.933, -21, 271, 0.13), (2.943, -25, 389, 0.053),
                   (2.368, -30.5, 3080, 0.028), (2.748, -53, 150, .05), (2.414, -51, 240, 0.062),
                   (2.765, -50, 456, .15), (2.8, -51.5, 400, .1), (4.503, -41, 210, 0.068),
                   (4.565, -38, 162, 0.085), (4.814, -39, 226, 0.06), (5.296, -45.5, 190, 0.053),
                   (4.883, -37, 196, 0.065), (4.928, -39, 166, 0.05), (5.121, -40, 250, 0.051),
                   (5.428, -45.5, 179, 0.55), (5.446, -35.5, 236, 0.052), (5.465, -36.5, 377, 0.027),
                   (5.5, -40, 307, 0.037), (6.306, -29, 406, 0.036), (6.329, -20.5, 460, 0.032),
                   (7.807, -34, 256, 0.063), (7.829, -38, 220, 0.04)]
    # time in seconds, peak in dB, t60 in seconds.
    footsteps = [
        (1.95, -59, .5),
        (2.67, -48, 0.34),
        (2.9, -38, 0.59),
        (4.2, -51.5, 12),
        (4.55, -53, .9),
        (7.001, -55, 7.8),
    ]
    # frequency in Hz, density in dB per Hz.
    ground_shake = [(30, -44), (60, -0.5), (110, -3), (170, -9), (260, -14.5), (600, -77)]
    out = np.zeros((2, N + SR))
    for s, db, hz, t60 in dull_knocks:
        pair = [(hz, db, t60, 0), (1.656 * hz, db + 0.5 - 0.004 * hz, 0.53 * t60, 0)]
        place(out, s, ring(pair, length=1 / 3, attack=0.00015, scatter_db=4.5, spread=0.24, rough=0.5))
    t = np.arange(N) / SR
    feet = 0
    for s, db, t60 in footsteps:
        since = np.maximum(t - s, 0)
        feet = feet + attenuation_scalar(db - 60 * since / t60) * (1 - np.exp(-since / 0.013))
    held_up = (t > 4.97) & (t < 6.25)
    weight_db = curves(np.concatenate(MOTOR_RUNS))[1]
    shake = attenuation_scalar(-48 + 0.71 * (weight_db - STEADY_DB)) + feet
    return out[:, :N] + shake * attenuation_scalar(-13 * held_up + 4.1 * wobble(9.4)) * rush(ground_shake)


def yard(x):
    # frequency in Hz, t60 in seconds.
    tail_t60 = [(100, 0.12), (1000, 0.31), (5000, 0.27), (15000, 0.32)]
    hz, t, z = signal.stft(rng.standard_normal((2, SR // 4)), SR, nperseg=256)
    tail = signal.istft(z * attenuation_scalar(-60 * t / along(tail_t60, hz)[:, None]), SR, nperseg=256)[1]
    late = np.pad(x, ((0, 0), (300, 0)))
    return signal.fftconvolve(late, tail / np.linalg.norm(tail[0]), axes=1)[:, :N]


def open_air():
    return attenuation_scalar(-81.0) * rush([(25, -33), (80, -10), (200, 2.0), (500, -8.5), (2000, -35.0), (6000, -54.5),
                              (16000, -61.5)])


def scene():
    first, second, third, lifted = hammer()
    hits = steel_and_splinters(first, second, third, lifted) + sockets(first, second)
    hits = hits + striker(np.concatenate([first, second, third, lifted]))
    thud = concrete(first, second, third, lifted)
    tail = attenuation_scalar(-12.5) * yard(hits + attenuation_scalar(-1.5) * thud)
    machine = motor() + strokes() + chatter()
    return hits + thud + singing() + machine + stones() + thumps() + tail + open_air()


def roll_off(x):
    return signal.sosfilt(signal.butter(12, 16810, fs=SR, output="sos"), x)


def record(dry):
    top = 0.53
    rounded = dry / (1 + np.abs(dry / top) ** 4) ** (1 / 4)
    heard = filtered(rounded, lambda hz: low_cut(hz, 70) ** 3 / (1 + (hz / 15850) ** 110))
    return roll_off(heard)


dry = scene()
out = record(dry)
waveform_to_disk(out)
```